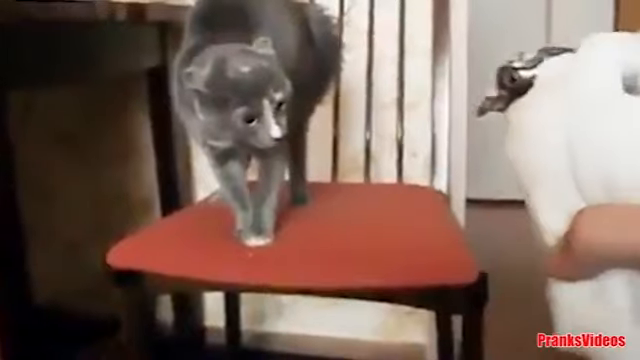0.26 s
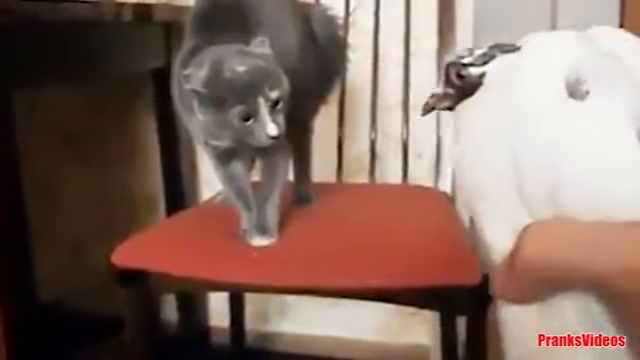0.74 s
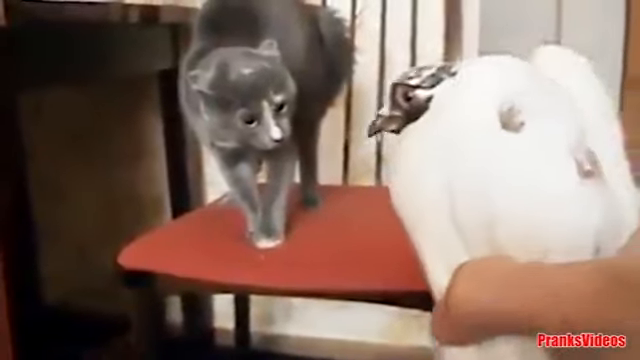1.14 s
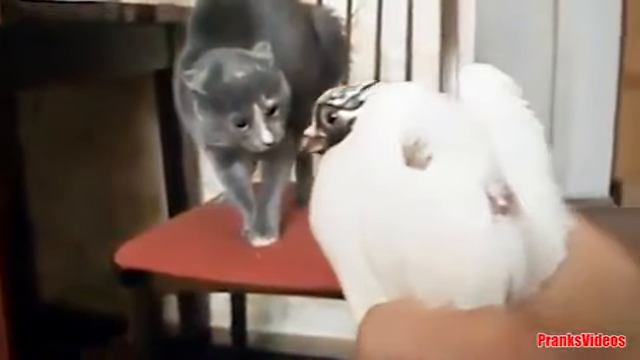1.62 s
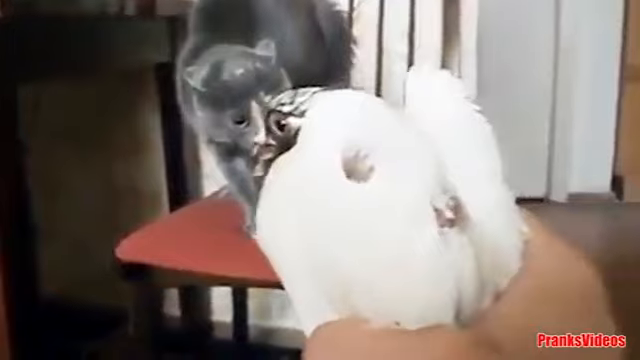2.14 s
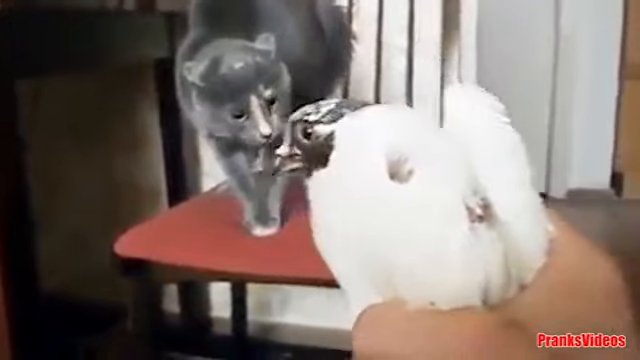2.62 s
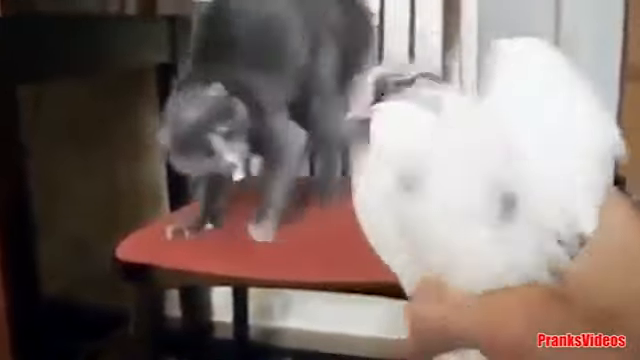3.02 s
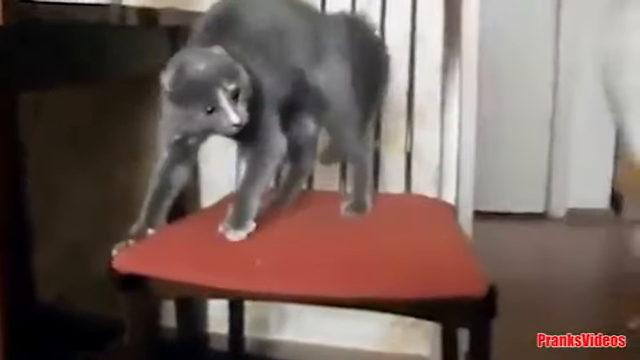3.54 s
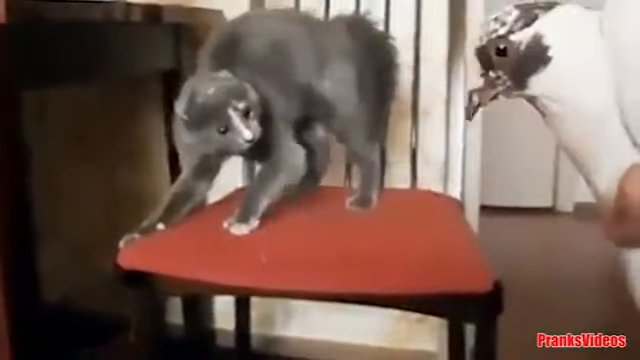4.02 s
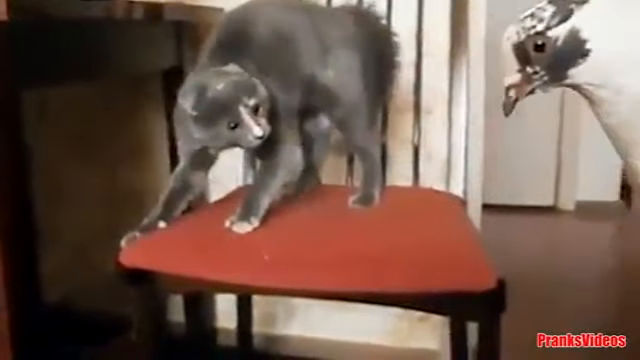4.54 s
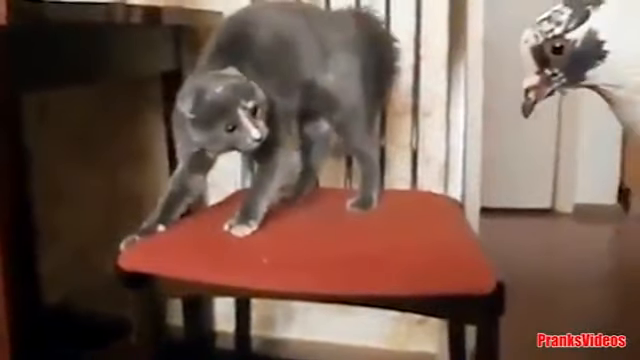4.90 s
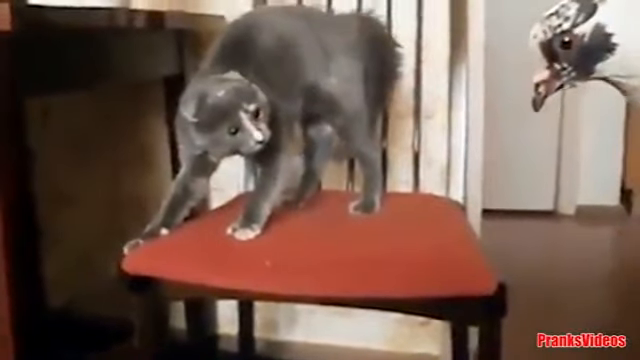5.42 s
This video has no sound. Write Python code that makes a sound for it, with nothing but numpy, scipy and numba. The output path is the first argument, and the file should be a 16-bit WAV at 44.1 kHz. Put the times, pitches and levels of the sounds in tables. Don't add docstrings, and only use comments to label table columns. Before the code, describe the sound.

Indoors, one cat warns an approaching bird, which makes no sound. First comes a drawn-out nasal growling moan, then over a second of quiet hiss and faint hand rumble with a small swallow. A click-like explosive spit breaks into a harsh shriek, drops, jumps up again, then slides into a sustained low yowl to the end. Close, cheap phone microphone, slightly distorted with metallic treble.

```python
import sys
import numpy as np
from scipy import signal
from scipy.io import wavfile
from scipy.ndimage import uniform_filter1d
from numba import njit

SR = 44100
rng = np.random.default_rng(int(sys.argv[2]) if len(sys.argv) > 2 else 0)


def generate_wav(sig):
    pcm = np.round(np.clip(np.atleast_2d(sig).T, -1, 1) * 32767).astype(np.int16)
    wavfile.write(sys.argv[1], SR, pcm)


def invert_db(level):
    return 10 ** (np.asarray(level, dtype=float) / 20)


N = 250047
T = np.arange(N) / SR
PHONE_RATE_HZ = 8000

# frequency in Hz, density in dB per Hz.
ROOM_HISS = [(18, -44), (30, -15.5), (161, -4), (329, -3), (688, -9), (794, -4), (1040, -8.5), (1120, -1),
             (1840, -20.5), (3470, -16.5), (4000, -22), (5200, -49), (8800, -120)]
# centre in seconds, half length in seconds, level in dB.
HAND_GRIPS = [
    (.3, 0.46, -52.5),
    (3.17, 0.035, -28),
    (3.5, .3, -47),
    (4.05, 0.15, -55),
    (4.9, .4, -48.5),
]
# frequency in Hz, width in Hz, level in dB.
OPENING_HISS = [(9330, 460, -40), (11900, 1800., -51), (7500., 600, -61), (13660, 380, -70),
                (1490, 3900, -59)]
# start in seconds, peak in dB, resonance in Hz, thump in
# dB, top in dB.
THROAT_CATCHES = [
    (1.56, -8.5, 830, -12, -17),
    (2.589, -34, 834, 0.5, -23),
    (3.057, -39, 1200, -6, -36),
    (3.071, -26.5, 895, -15, -20),
    (3.49, -17, 1052, -36, -18),
]
# time in seconds, level in dB, lower resonance in Hz, upper minus lower in dB.
SPIT_BLAST = [
    (2.95, -53.5, 1211, -1.5),
    (3.055, -39, 1020, 0),
    (3.065, -25.5, 975, -9.5),
    (3.135, -32.5, 1273, -7.5),
    (3.143, -13.5, 1300, -17),
    (3.15, 6, 1350, -19),
    (3.19, -6, 1550, -3.5),
    (3.22, -31, 1980, 10),
    (3.26, -48, 2214, 22),
]
# centre in seconds, half length in seconds, added irregularity from 0 to 1.
VOICE_BREAKS = [(.5, .8, .1), (1.585, .035, .45), (3.25, .075, .65), (3.37, .035, .3), (3.515, .032, .88),
                (3.6, .045, .15), (4.068, .018, .35), (4.19, .095, .5), (4.62, .1, .35), (4.82, .12, .2),
                (5.4, .45, .08)]
BREAK_AIR_DB = [-67, -63, -22, -36.5, -31, -40.5, -25, -29.5, -43.5, -38, -44.5]
# start in seconds, length in seconds,
# first pitch in Hz, last pitch in Hz, level in dB.
SECOND_VIBRATION = [
    (3.249, .215, 2360, 2156, -20.5),
    (3.478, 0.089, 1867, 1833, -25),
    (4.149, 0.12, 1880, 1854, -20),
    (4.532, .18, 1157, 1057, -27.5),
    (4.7, 0.16, 1057, 1017, -23.5),
    (4.856, .13, 1025, 992, -31.5),
]
# centre in seconds, gain in dB, half length in seconds.
BREATH_PUSHES = [(.435, 5, .02), (.492, 9, .02), (.535, 5, .012), (.93, 4, .03), (.985, -6, .006),
                 (1.005, 6, .014), (1.435, 5.5, .025), (3.297, 5, .004), (3.345, -3, .006),
                 (4.053, -6, .003), (4.061, 3, .003), (4.068, -5, .003), (4.153, 3, .003),
                 (4.274, -8, .005), (4.284, 9, .004), (3.652, 5, .006), (5.11, 3, .02), (4.783, 11, .013),
                 (4.839, -12, .005), (4.852, 4, .008), (4.9, -6, .006)]
# pitch in Hz, 1st harmonic in dB, 3rd harmonic in dB.
CHEST_REGISTER = [(493, -32, -32.5), (507.7, -54, -42), (541, -30.5, -37), (632.4, -49, -49),
                  (624, -38, -40.5), (740, -40.5, -41.5), (905, -31.5, -46), (1110, -23, -28.5)]
# frequency in Hz, gain in dB.
OPEN_MOUTH = [(1600, 11.5), (1900, -4), (2250, -6.5), (2600, 1.5), (3400, 0.5), (3650, -1), (3950, -4.5),
              (4500, -13)]
# start in seconds, end in seconds.
HEAD_SPELLS = [
    (3.2, 3.646),
    (4.072, 4.208),
]
# time in seconds, pitch in Hz, throat level in dB, mouth
# ring in dB.
MOAN_PHRASE = [(.087, 438.5, -29.5, -56.5), (.23, 459, -29.5, -47), (.37, 447.7, -29.5, -55.5),
               (.5, 441.4, -21, -46.5), (.7, 453.7, -23.5, -38.5), (.8, 464.8, -22.5, -40),
               (.88, 474, -22.5, -53.5), (.98, 485, -21.5, -43),
               (1.1, 478, -23, -48), (1.22, 473, -30, -49), (1.31, 460, -22, -42), (1.39, 448, -18, -38),
               (1.47, 440, -15, -38), (1.532, 430, -14.5, -39), (1.548, 410, -21, -52),
               (1.572, 398, -33, -58), (1.6, 385, -44, -62)]
# time in seconds, pitch in Hz, throat level in dB, mouth ring in dB.
SCREAM_PHRASE = [(3.22, 1441, -27.5, -32), (3.26, 1352, -28.5, -16), (3.33, 1333, -22.5, -21),
                 (3.365, 1317, -14.5, -14.5), (3.4, 1300, -27, -20.5), (3.435, 1217, -25, -18.5),
                 (3.53, 1190, -30, -38.5), (3.59, 944, -33.5, -34.5), (3.642, 848.4, -42.5, -47.5)]
# time in seconds, pitch in Hz, throat level in dB, mouth ring in dB.
HOLD_PHRASE = [(3.65, 708, -29.5, -45), (3.686, 622.7, -35, -32), (3.73, 630, -42, -32.5),
               (3.839, 612.6, -24.5, -31), (3.93, 647, -32, -41.5), (4.022, 638.5, -28, -32.5),
               (4.042, 670, -9.5, -26.5), (4.07, 757.6, -6.5, -22)]
# time in seconds, pitch in Hz, throat level in dB, mouth ring in dB.
LEAP_PHRASE = [(4.075, 1005, -18.5, -26.5), (4.095, 1100, -18.5, -17.5), (4.128, 1171, -28.5, -16.5),
               (4.165, 1153, -23.5, -18.5), (4.203, 1125, -16, -23.5)]
# time in seconds, pitch in Hz, throat level in dB, mouth ring in dB.
FALL_PHRASE = [(4.209, 1110, -19.5, -33.5), (4.26, 940, -24.5, -30), (4.3, 742, -17, -33)]
# time in seconds, pitch in Hz, throat level in dB, mouth ring in dB.
SLIDE_PHRASE = [(4.321, 740, -16.5, -29), (4.395, 734.3, -17, -36), (4.511, 656, -14.5, -31),
                (4.519, 648, -26, -28), (4.629, 606, -31.5, -39.5), (4.739, 569.7, -25.5, -44.5),
                (4.862, 563.5, -18, -34), (4.921, 534.3, -20, -40)]
# time in seconds, pitch in Hz, throat level in dB, mouth ring in dB.
YOWL_PHRASE = [(4.99, 521.8, -17.5, -36.5), (5.038, 510.9, -10.5, -28), (5.132, 514.1, -16, -35.5),
               (5.199, 496.4, -21, -42), (5.298, 477.4, -21.5, -34), (5.402, 468.7, -17.5, -45.5),
               (5.451, 458, -21.5, -47.5), (5.589, 471.7, -22, -36.5), (5.67, 464.4, -17, -36)]


def noise():
    return rng.standard_normal(N)


def unit(x):
    return x / np.sqrt(np.mean(np.abs(x) ** 2))


def lowpass(x, hz, order):
    return signal.sosfilt(signal.butter(order, hz, fs=SR, output="sos"), x)


@njit
def band(x, hz, width):
    y, b, l = np.empty(len(x)), 0., 0.
    for i in range(len(x)):
        g, k = np.tan(np.pi * hz[i] / SR), width / hz[i]
        v = (b + g * (x[i] - l)) / (1 + g * (g + k))
        b, l, y[i] = 2 * v - b, l + 2 * g * v, k * v
    return y


def ringing_noise(hz, width_hz, passes=1):
    x = noise()
    for _ in range(passes):
        x = band(x, np.full(N, hz, float), width_hz)
    return unit(x)


def flutter(hz):
    return unit(lowpass(noise(), hz, order=2) + 1j * lowpass(noise(), hz, order=2))


def bump(s, half, order=2):
    return np.exp(-((T - s) / half) ** order)


def columns(rows):
    s, *cols = np.transpose(rows)
    gate = uniform_filter1d(1. * ((T > s[0]) & (T <= s[-1])), size=300)
    return [np.interp(T, s, c) for c in cols] + [gate]


def room_tone():
    hiss = 0
    hzs, dbs = np.transpose(ROOM_HISS)
    for hz in 40 * 2 ** np.arange(0, 6.7, 1 / 3):
        db = np.interp(np.log(hz), np.log(hzs), dbs) + 10 * np.log10(hz)
        hiss = hiss + invert_db(db + 0.42 * flutter(9).real) * ringing_noise(hz, hz / 4)
    grip = invert_db(-57.5) + sum(invert_db(db) * bump(s, half) for s, half, db in HAND_GRIPS)
    rumble = unit(band(lowpass(noise(), 78, order=4), np.full(N, 65.), 41.0))
    return invert_db(-42.5) * unit(hiss) + grip * rumble


def gain_control(sound):
    over = np.maximum(uniform_filter1d(np.abs(sound), size=800) - .24, 0)
    leak = 1 / (.5 * SR)
    duck_db = -450 * signal.lfilter([leak], [1, leak - 1], over)
    return invert_db(duck_db)


def walls(sound):
    t60_s, delay_s = .5, .004
    t = T[:SR // 2] - delay_s
    tail = rng.standard_normal(len(t)) * (t > 0) * invert_db(-60 * t / t60_s)
    tail = signal.sosfilt(signal.butter(2, [550, 2000], "band", fs=SR, output="sos"), tail)
    return invert_db(-24) * signal.fftconvolve(sound, tail / np.sqrt(np.sum(tail ** 2)))[:N]


def swallows():
    out, peak_s = np.zeros(N), .004
    for s, db, hz, thump_db, top_db in THROAT_CATCHES:
        t = np.maximum(T - s, 0)
        ring = np.sin(2 * np.pi * hz * t)
        ring += invert_db(thump_db) * np.sin(2 * np.pi * 390 * t)
        ring += invert_db(top_db) * np.sin(2 * np.pi * 2650 * t)
        out += .5 * invert_db(db) * ring * t / peak_s * np.exp(1 - t / peak_s)
    return out


def air():
    spit_db, low_hz, upper_db, gate = columns(SPIT_BLAST)
    spit = gate * invert_db(spit_db)
    breath = sum(invert_db(db) * bump(s, half, order=4) for (s, half, _), db in zip(VOICE_BREAKS, BREAK_AIR_DB))
    shut = np.interp(T, (4.3, 4.9), (0, 1))
    open_hz, closed_hz = 1800, 1300.
    low_hz = np.where(T < SPIT_BLAST[-1][0], low_hz, open_hz + shut * (closed_hz - open_hz))
    low = ringing_noise(uniform_filter1d(low_hz, size=4000), 650., passes=2)
    high = ringing_noise(2760 - 400 * shut, 950., passes=2)
    buffet = ringing_noise(560., 1300.0)
    blast = spit * (low + invert_db(upper_db) * high + invert_db(-8.5) * buffet)
    leak = invert_db(-3) * low + invert_db(1.5 - 6 * shut) * high + invert_db(-8.5 - 12.5) * buffet
    blast = blast + breath * invert_db(1.8 * flutter(90).real) * leak
    return invert_db(2.5 * flutter(60).real) * blast


def whine():
    out, fade_s = 0, 0.0061
    for s, length, first_hz, last_hz, db in SECOND_VIBRATION:
        hz = first_hz + (last_hz - first_hz) * np.clip((T - s) / length, 0, 1) ** 0.82
        shape = np.clip(np.minimum(T - s, s + length - T) / fade_s, 0, 1)
        tone = np.exp(2j * np.pi * np.cumsum(hz) / SR) * (0.67 + 0.62 * flutter(60))
        out = out + shape * invert_db(db) * tone.real
    return out


def push_db():
    shake = (T > 4.397) * (T < 4.474) * (-np.cos(2 * np.pi * 43 * (T - 4.405)) - .15)
    return sum(db * bump(s, half) for s, db, half in BREATH_PUSHES) + 5 * shake


def register_levels(hz, db, top_db, third_db):
    pitches, firsts, thirds = np.transpose(CHEST_REGISTER)
    gape_hz, gape_db = np.transpose(OPEN_MOUTH)
    weak = .3 * (db + 17.5)
    head = sum((T > a) & (T < b) for a, b in HEAD_SPELLS) > 0
    db1 = np.where(head, db, np.interp(hz, pitches, firsts) + weak)
    db2 = np.where(head, top_db + np.interp(2 * hz, gape_hz, gape_db), db)
    chest3 = np.interp(hz, pitches, thirds) + weak + third_db
    db3 = np.where(head, top_db + np.interp(3 * hz, gape_hz, gape_db), chest3)
    return [uniform_filter1d(v, size=200) for v in (db1, db2, db3)]


def upper_harmonics(hz, top_db, db2, open_db, skirt_db, mouth_hz):
    k = np.arange(4, 10)[:, None]
    lips = invert_db(open_db) * np.clip((hz - 560) / 80, 0, 1) / (1 + ((k * hz - 3650) / 250) ** 2)
    upper = 1 / (1 + ((k * hz - mouth_hz) / 90) ** 2) ** 2
    upper = upper / np.sqrt(np.sum(upper ** 2, axis=0)) + lips + invert_db(skirt_db) * (4 / k) ** 5.7
    upper = upper * (k * hz < PHONE_RATE_HZ / 2) * invert_db(top_db) * np.clip((850 - hz) / 100, 0, 1)
    upper[0] += invert_db(db2 - 16) * (hz > 820) * (hz < PHONE_RATE_HZ / 8)
    return upper


def voice(rows, nose_db, open_db, third_db, skirt_db, mouth_hz, waver, nose_hz, nose_width_hz):
    hz, db, top_db, gate = columns(rows)
    hz = hz * (1 - .12 * bump(3.305, .009, order=4))
    push = push_db() + 1.2 * waver * flutter(26).real
    db, top_db = db + push, top_db + np.where(hz > 850, 1, .4) * push
    db1, db2, db3 = register_levels(hz, db, top_db, third_db)
    rough = .055 + sum(share * bump(s, half, order=4) for s, half, share in VOICE_BREAKS)
    rough = np.clip(rough, 0, .95)
    tremor = .1 * waver * np.minimum(rough, .16) * flutter(18).real + .045 * rough * flutter(70).real
    phase = 2 * np.pi * np.cumsum(hz * (1 + tremor)) / SR
    upper = upper_harmonics(hz, top_db, db2, open_db, skirt_db, mouth_hz)
    out = 0
    for n, size in enumerate([invert_db(db1), invert_db(db2), invert_db(db3), *upper]):
        share = np.minimum(rough * (.4 if n == 0 else .3 + .4 * n), .95)
        fold = np.sqrt(1 - share ** 2) * invert_db(1.3 * flutter(35).real) + share * flutter(120)
        out = out + np.sqrt(2) * size * (fold * np.exp(1j * (n + 1) * phase)).real
    nose_level = invert_db(0.39 * db2 + nose_db) * np.clip((600 - hz) / 100, 0, 1)
    return (out + nose_level * ringing_noise(nose_hz, nose_width_hz)) * gate


def scene():
    moan = voice(MOAN_PHRASE, nose_db=-35.0, open_db=-40, third_db=-13, skirt_db=-17,
                 mouth_hz=2596, waver=0.98, nose_hz=830., nose_width_hz=34.0)
    cry = SCREAM_PHRASE + HOLD_PHRASE + LEAP_PHRASE + FALL_PHRASE + SLIDE_PHRASE + YOWL_PHRASE
    yowl = voice(cry, nose_db=-33.5, open_db=-21, third_db=1.86, skirt_db=-8,
                 mouth_hz=2410, waver=.5, nose_hz=1280.0, nose_width_hz=130.0)
    second = whine()
    sum_tone = band(yowl * second, np.full(N, 3500.), 500.)
    cat = moan + yowl + second + 6.4 * sum_tone + air() + swallows()
    return (cat + walls(cat) + gain_control(cat) * room_tone())[None]


def top_cut(x):
    return signal.sosfilt(signal.butter(12, 15700, fs=SR, output="sos"), x)


def record(dry):
    overloaded = np.clip(dry[0], -.96, .96)
    narrow = signal.sosfiltfilt(signal.butter(14, 4090, fs=SR, output="sos"), overloaded)
    mirrored = narrow * (1 + 2 * np.cos(2 * np.pi * PHONE_RATE_HZ * T))
    smooth = signal.sosfiltfilt(signal.butter(8, 4150, fs=SR, output="sos"), mirrored)
    smooth = signal.sosfiltfilt(signal.ellip(8, .2, 30, 4880, fs=SR, output="sos"), smooth)
    smooth = smooth - 0.14 * np.sign(smooth) * np.maximum(np.abs(smooth) - .7, 0) ** 2
    start_s = .0862
    out = np.clip(smooth - .0035, -.99, .99) * (T > start_s)
    hiss = sum(invert_db(db) * ringing_noise(hz, width, passes=2) for hz, width, db in OPENING_HISS)
    out = out + hiss * np.clip(1 - T / 0.011, 0, 1) ** 0.53
    return top_cut(out[None])


dry = scene()
out = record(dry)
generate_wav(out)
```